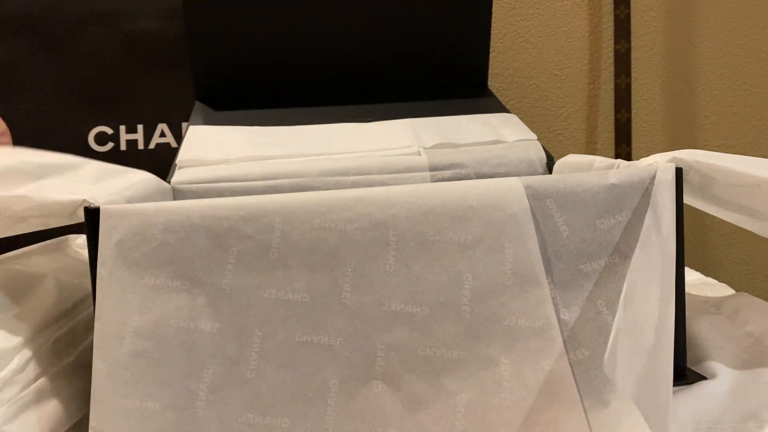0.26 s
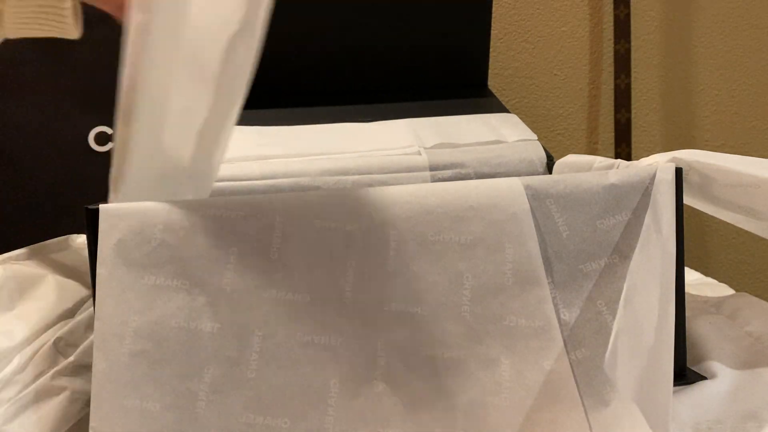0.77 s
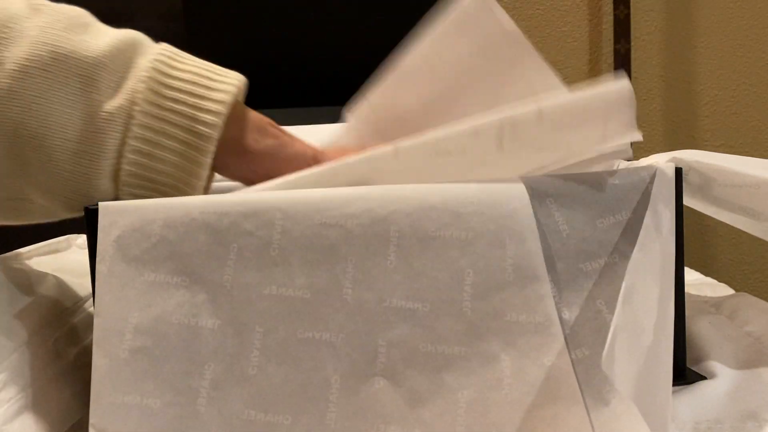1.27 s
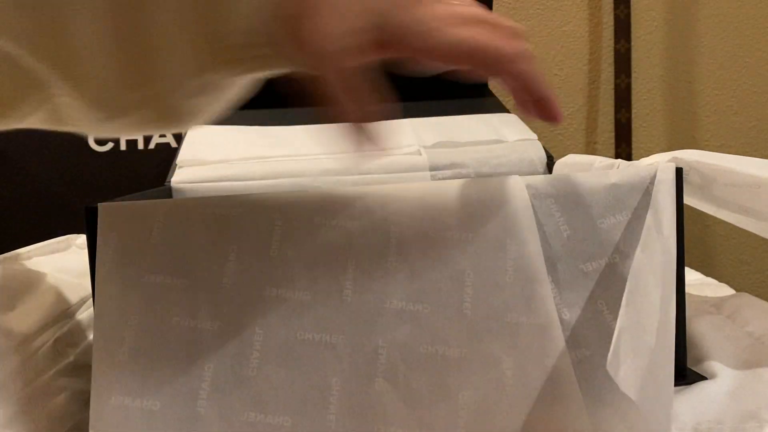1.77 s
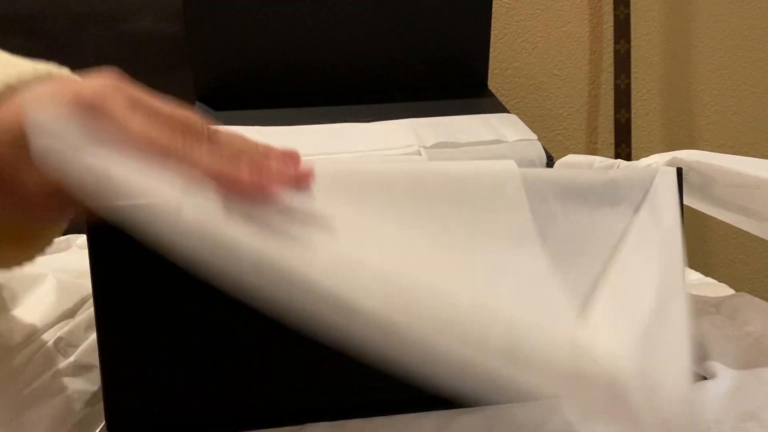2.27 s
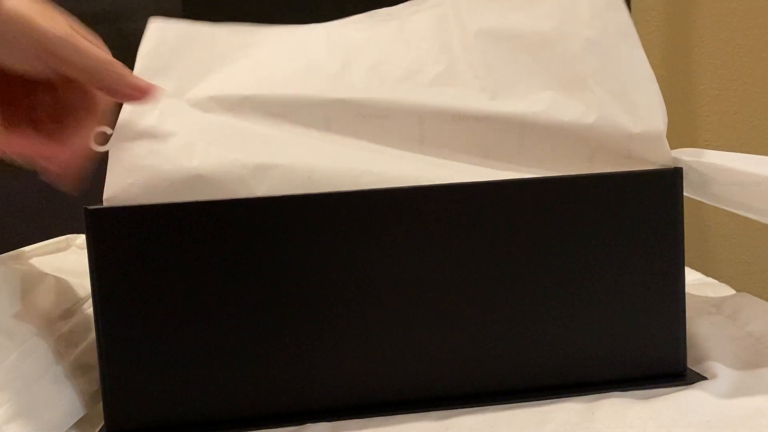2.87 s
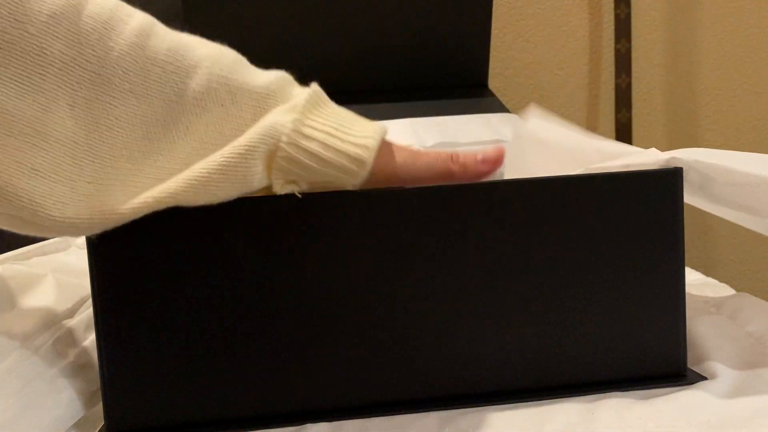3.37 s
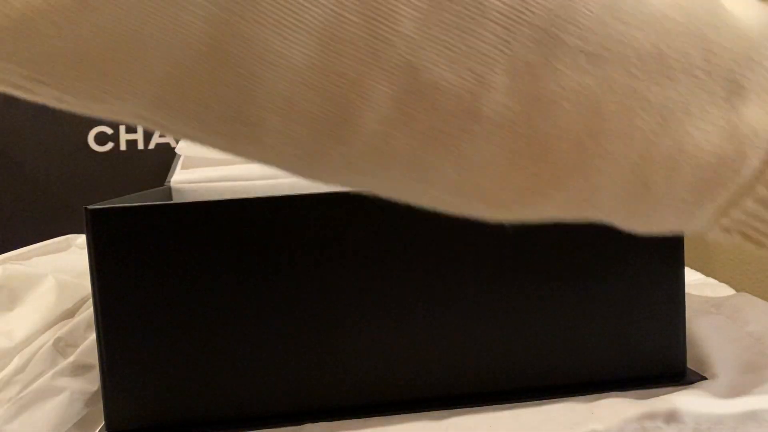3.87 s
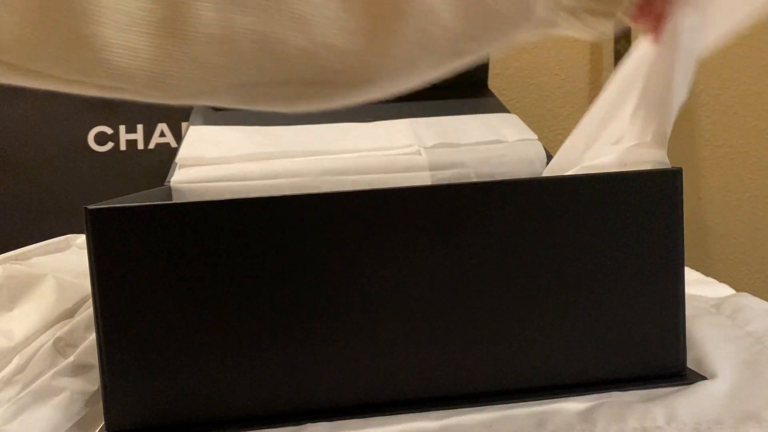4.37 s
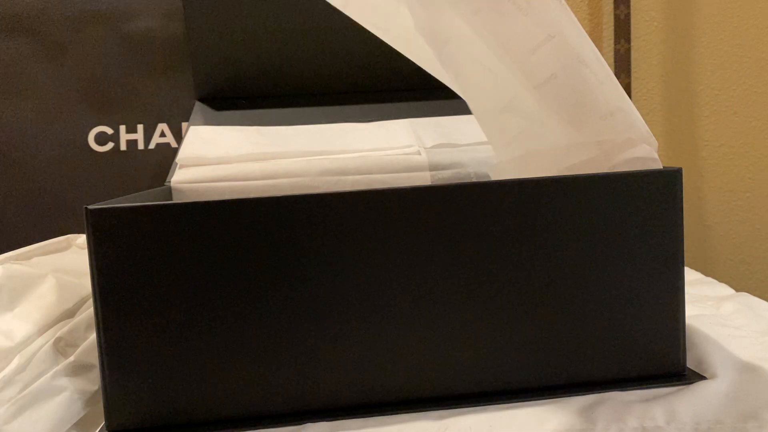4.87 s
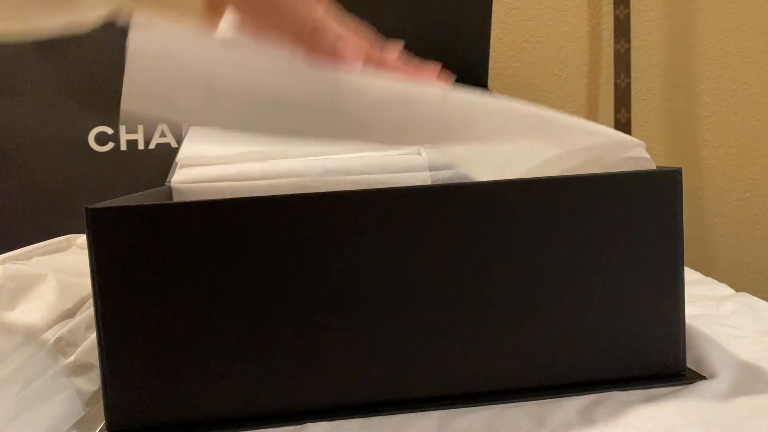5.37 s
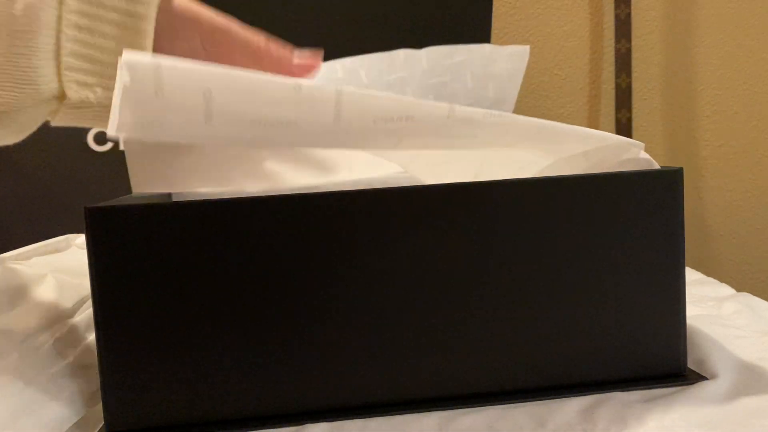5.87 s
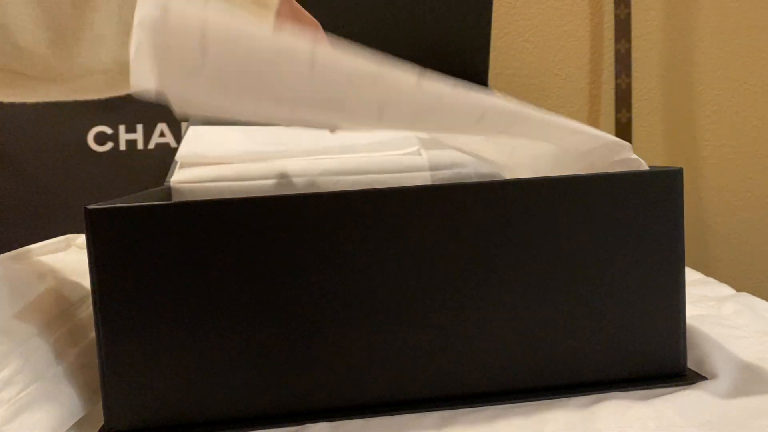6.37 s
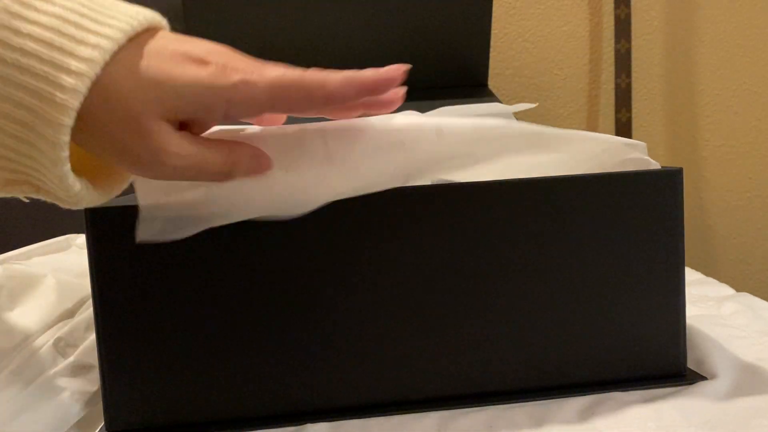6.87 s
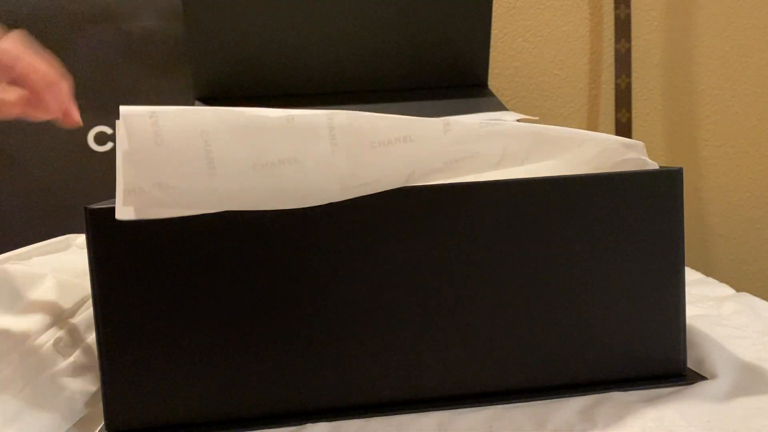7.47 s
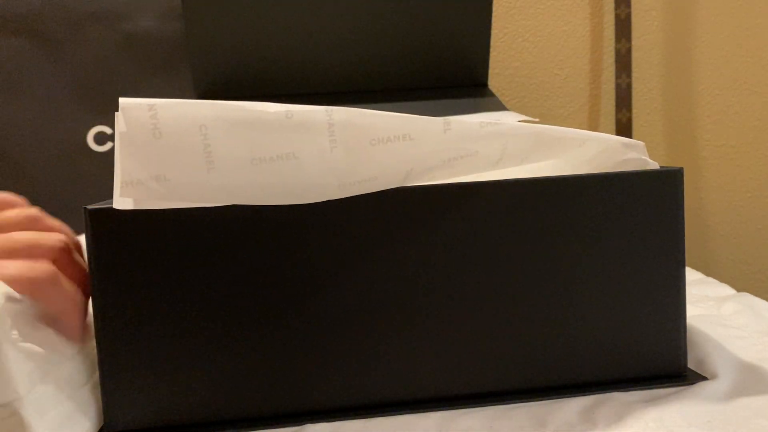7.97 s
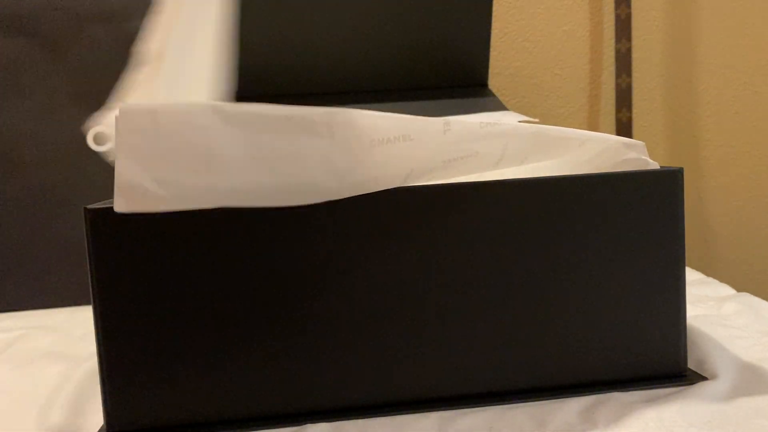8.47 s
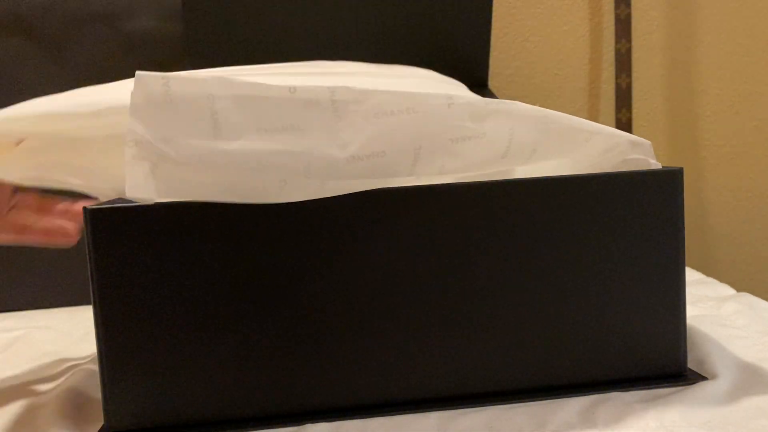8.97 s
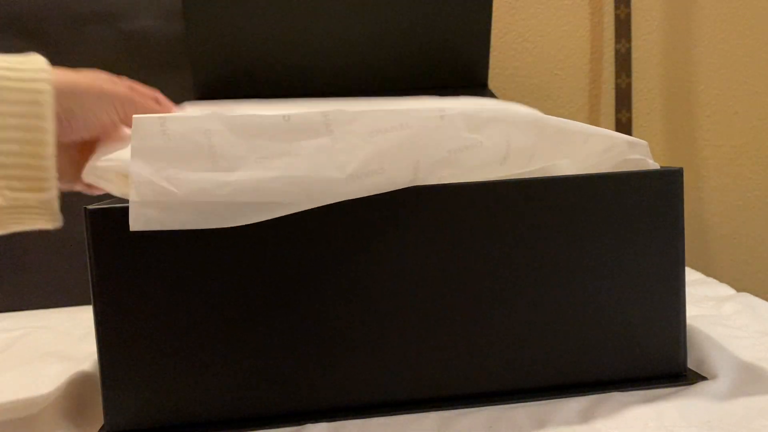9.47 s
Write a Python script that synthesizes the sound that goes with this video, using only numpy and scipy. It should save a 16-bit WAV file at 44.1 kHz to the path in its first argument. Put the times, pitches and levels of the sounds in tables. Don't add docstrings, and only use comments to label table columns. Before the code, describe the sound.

Hands fold, sweep and tuck thin tissue paper over a rigid cardboard box, crackling densely, ticking as it settles, with dull muffled bumps.

```python
import sys
import numpy as np
from scipy import signal
from scipy.fft import rfft, irfft, next_fast_len
from scipy.io import wavfile
from scipy.ndimage import uniform_filter1d

SR = 44100
rng = np.random.default_rng(int(sys.argv[2]) if len(sys.argv) > 2 else 0)


def generate_wav(signal):
    frames = np.transpose(np.atleast_2d(signal))
    scaled = np.clip(frames, -1, 1) * 32767
    pcm = np.round(scaled).astype(np.int16)
    wavfile.write(sys.argv[1], SR, pcm)


N = 428652
SIZE = next_fast_len(N)
HZ = np.arange(SIZE // 2 + 1) * SR / SIZE + 1e-3


def from_db(db):
    return 10 ** (np.asarray(db) / 20)


def at_hz(points):
    hz, value = np.transpose(points)
    return np.interp(np.log(HZ), np.log(np.maximum(hz, 1)), value)


def above(edge_hz, steep):
    return 1 / (1 + (edge_hz / HZ) ** steep)


def back(spectra):
    return irfft(spectra, SIZE)[:, :N]


def fade(x, t60):
    return signal.lfilter([1], [1, -from_db(-60 / (t60 * SR))], x + 1e-18)


def impulses(per_s, spread_db):
    sizes = from_db(spread_db * np.minimum(rng.exponential(1, N), 2.6))
    return sizes * (rng.random(N) < per_s / SR)


def even(x, window_s):
    window = int(window_s * SR)
    power = uniform_filter1d(np.mean(x ** 2, axis=0), window)
    return x / np.sqrt(uniform_filter1d(power, window) + 1e-20)


# frequency in Hz, likeness from 0 to 1.
PORT_LIKENESS = [(60, 0.99), (110, 0.73), (200, 1), (380, 0.72), (700, 0.54), (1290, 0.59), (2380, 0.19),
                 (4400, 0.54), (8120, 0.033), (15000, 0.049)]
# frequency in Hz, left over right in dB.
LEFT_OVER_RIGHT = [(60, -0.5), (250, 3.5), (1000, 0.5), (2500, 3), (5000, 3.5), (8000, -8.5)]
# frequency in Hz, phase in radians.
LEFT_LEAD = [(300, 0.23), (1000, 0.81), (1600, 1), (2600, 0.53), (4000, 0.28), (5600, -0.78)]


def spread(pair):
    mid, side = rfft(pair, SIZE)
    alike = np.clip(at_hz(PORT_LIKENESS), 0, 0.98)
    both = np.sqrt(1 + alike) * mid + np.sqrt(1 - alike) * side * [[1], [-1]]
    halves = np.array([[0.5], [-0.5]])
    lead = np.exp(1j * at_hz(LEFT_LEAD) * halves)
    return both * lead * from_db(at_hz(LEFT_OVER_RIGHT) * halves) / np.sqrt(2)


# frequency in Hz, level in dB per Hz.
ROOM_COLOUR = [(25, 9), (70, 11), (200, 1.5), (800, -59.5), (2750, -40), (8000, -19), (16000, 0.5)]


def room_tone():
    noise = back(spread(rng.standard_normal((2, N))) * from_db(at_hz(ROOM_COLOUR)))
    return from_db(-69.5 + 3.5) * noise / np.std(noise)


# frequency in Hz, level in dB per Hz.
PAPER_COLOUR = [(25, -25), (64, -19), (138, -14.5), (414, -6), (800, -1), (1000, 2.5), (1250, 0.5),
                (1600, 1), (3600, 4), (7000, -1), (11000, -4), (16000, -5)]
ZONE_EDGES = (600, 2200, 7000)
# time in seconds, crackle level in dB, bulk over crackle in dB.
FEEL_FLAP = [(0.0, -48.5, -16), (0.06, -54.5, -12), (0.106, -48, -12.5), (0.23, -56, -9), (0.25, -53, -14)]
LIFT_FLAP = [(0.258, -47.5, -7.5), (0.396, -48, -10.5), (0.416, -42.5, -10), (0.522, -46.5, -8.5),
             (0.69, -39.5, -10), (0.896, -50, -10), (1.038, -53.5, -23), (1.128, -45, -28)]
LAY_FLAP = [(1.137, -38, -27), (1.204, -42, -22.5), (1.428, -44, -9.5), (1.698, -72.5, -10.5),
            (1.894, -76, -33), (1.9, -79, 4)]
TOUCH_FRONT = [(1.908, -58.5, -12), (1.988, -64.5, -19), (2.0, -62, -6), (2.078, -56, -31)]
SWEEP_FRONT = [(2.087, -38, -30), (2.112, -39.5, -18.5), (2.268, -37, -18.5), (2.312, -31.5, -13),
               (2.36, -37.5, -7.5), (2.462, -32.5, -6), (2.638, -41.5, -8), (2.688, -36.5, -5.5),
               (2.76, -48.5, -0.5)]
FRONT_SETTLES = [(2.77, -49.5, -4.5), (2.926, -52, 2.5), (3.002, -61, -6), (3.122, -60, 2.5),
                 (3.142, -70, 7), (3.262, -53.5, -2)]
PRESS_DOWN = [(3.274, -38.5, -4), (3.286, -32.5, -6), (3.39, -38, -14.5), (3.42, -42.5, -3.5),
              (3.492, -39.5, -4), (3.765, -67.5, -10), (3.964, -72, -19), (4.02, -53, -13)]
PULL_SIDE = [(4.028, -43.5, -16), (4.06, -47.5, -10), (4.426, -45.5, -9), (4.644, -40.5, -8),
             (4.78, -48.5, -7.5), (4.832, -42, -18), (4.868, -49, -9), (5.238, -74.5, -19),
             (5.25, -64, -34)]
FOLD_OVER = [(5.262, -41.5, -37), (5.284, -37, -28), (5.346, -41, -15.5), (5.458, -37.5, -12.5),
             (5.608, -45.5, -5), (5.948, -61, -10.5), (5.956, -50.5, -27), (6.17, -52, -18),
             (6.176, -44.5, -34)]
TUCK = [(6.19, -37.5, -22.5), (6.276, -43, -24), (6.374, -40, -12.5), (6.418, -35.5, -12.5),
        (6.458, -42.5, -12.5), (6.644, -48.5, -13), (6.668, -49.5, -16)]
TUCK_SETTLES = [(6.676, -54.5, -17), (6.788, -57, -18), (6.85, -51.5, -17)]
SMOOTH_TOP = [(6.86, -44.5, -23), (6.944, -36.5, -7.5), (7.138, -40, -4.5), (7.194, -35, -4),
              (7.292, -43.5, -2.5), (7.35, -36, -14), (7.368, -45, -7), (7.422, -44.5, -7.5),
              (7.65, -69, -1)]
PINCH = [(7.657, -48, -14), (7.742, -47.5, -3.5), (7.798, -53, -13), (7.822, -52.5, -22), (7.932, -53, -23)]
DRAW_OUT = [(7.942, -47.5, -23), (8.078, -40.5, -16.5), (8.178, -44, -11), (8.24, -51.5, -25),
            (8.338, -41.5, -26.5), (8.53, -50, -24), (8.54, -51, -16)]
SWING_ROUND = [(8.548, -46.5, -17), (8.606, -47.5, -18.5), (8.77, -44, -22), (8.78, -44, -19)]
LIFT_GOODS = [(8.794, -38, -14), (8.828, -35, -7), (8.902, -37.5, -12.5), (8.938, -42, -15),
              (8.992, -39, -7.5), (9.246, -54.5, -10)]
SHIFT_GOODS = [(9.254, -47, -14.5), (9.374, -41, -5.5), (9.41, -40.5, -10.5), (9.682, -38, -2.5),
               (9.71, -44, -6), (9.72, -42, -10.5)]
# start in seconds, rustle in dB, crispness in dB.
PAPER_IN_GRIP = [(0, -3, -1.1), (.95, 3, -0.6), (2.08, -1.7, -0.6), (3.27, 0, -1.5), (4.02, 1.5, 1.5),
                 (5.25, 0, 0.8), (5.4, -0.1, 0.2), (6.3, -3, -0.74), (7.4, -0.7, 0.5), (7.9, -0.5, 0),
                 (8.22, 3, -1), (8.54, -0.8, 0), (8.79, -3.5, -4)]


def crinkle():
    s, crackle_db, bulk_db = np.transpose(
        FEEL_FLAP + LIFT_FLAP + LAY_FLAP + TOUCH_FRONT + SWEEP_FRONT + FRONT_SETTLES
        + PRESS_DOWN + PULL_SIDE + FOLD_OVER + TUCK + TUCK_SETTLES + SMOOTH_TOP
        + PINCH + DRAW_OUT + SWING_ROUND + LIFT_GOODS + SHIFT_GOODS)
    since, layers_db, fresh_db = np.transpose(PAPER_IN_GRIP)
    grip = np.maximum(np.searchsorted(since, s) - 1, 0)
    harder_db = crackle_db + 46
    rustle_db = layers_db[grip] - 1 + 0.47 * bulk_db
    crisp_db = fresh_db[grip] + 2 + 0.25 * harder_db

    t = np.arange(N) / SR
    worked_db = np.interp(t, s, crackle_db)
    dense = 1.9 * from_db(0.25 * (worked_db + 46))
    fine = fade(impulses(1500, spread_db=1.0), 0.00098)
    coarse = fade(impulses(140, spread_db=3.5), 0.0058)
    clicks = (fine + coarse + dense) * rng.standard_normal((2, N))
    spectra = spread(clicks) * from_db(at_hz(PAPER_COLOUR))

    low, middle, high = (above(hz, 8) for hz in ZONE_EDGES)
    steady, quick = from_db(worked_db), folds()
    shared = fade(impulses(110, spread_db=3.0), 0.017)
    # zone, level over crackle in dB, trim in dB, share of folds, of cracks, of brightness.
    zones = [(middle - high, 0 * s, -1.5, 0.36, 0.48, -0.6),
             (1 - low, bulk_db, -1.0, 0.46, 0.26, -0.5),
             (low - middle, rustle_db, 0.0, 0.63, 0.46, -0.82),
             (high, crisp_db, 7.5, 2.24, 0.68, 0.43)]
    out = 0
    for zone, over_db, trim_db, fold_share, crack_share, bright_share in zones:
        own = fade(impulses(131, spread_db=9.5), 0.066)
        clumps = 10.7 + shared + 0.41 * own
        effort = steady + fold_share * quick + crack_share * cracks(bright_share)
        gain = effort * from_db(np.interp(t, s, over_db) + trim_db)
        out = out + even(clumps * back(spectra * zone), 0.19) * gain
    hollow_hz = 430 * 2 ** (7 * bulk_db)
    return sheet_shape(out, s, hollow_hz)


# time in seconds, level in dB, brightness in dB.
CRACKS_FRONT = [(0.016, -41, 3), (0.0249, -51, 0), (0.0863, -37, -4), (0.106, -37, -4), (0.1397, -32, 3),
                (0.1492, -37, 1), (0.1596, -35, 1), (0.1956, -38, 15), (0.2673, -41, 21), (0.2868, -32, 9),
                (0.3682, -41, -2), (0.4096, -30.5, 2), (0.4515, -33, 8), (0.4954, -39, -2),
                (0.5088, -39, -1), (0.6066, -27, -1), (0.6632, -23, -13), (0.813, -33, -12),
                (0.8541, -37, 7), (0.876, -44, 5), (0.8955, -45, 13), (0.9269, -46, 3), (0.9902, -34, 1),
                (0.9977, -38, -1), (1.0072, -39, -13), (1.0302, -45, -10), (1.0965, -38, 10),
                (1.2247, -41, 8), (1.2367, -41, -1), (1.327, -41, -4), (1.4302, -46, -9), (1.4575, -35, -6),
                (2.0914, -30.5, -7), (2.176, -20, -7), (2.2046, -23, -10), (2.3013, -33, -1),
                (2.3117, -37, 5), (2.3951, -27, 14), (2.4674, -20, 2), (2.6555, -24, -9), (2.6814, -27, 0),
                (2.766, -23, 1), (2.7862, -38, 10), (3.075, -39, 10)]
CRACKS_FOLD = [(3.2805, -33, 0), (3.382, -25, 3), (3.4514, -22, -7), (3.4951, -45, -2), (3.611, -26, -1),
               (4.031, -42, 4), (4.0425, -33, -6), (4.075, -36, 16), (4.0967, -40, 4), (4.1635, -30, -5),
               (4.173, -34, -13), (4.226, -30, -15), (4.2927, -41, 15), (4.3272, -30.5, -5),
               (4.352, -35, 5), (4.473, -34, -8), (4.49, -25.5, 11), (4.537, -27, 5), (4.5596, -30, -2),
               (4.6065, -37, 0), (4.646, -24.5, 5), (4.6773, -29, -7), (4.7148, -30, 11), (4.7412, -39, 8),
               (4.809, -31, 17), (4.8325, -34, 19), (4.846, -33, 10), (5.2835, -28, 10), (5.3583, -36, -12),
               (5.4681, -27, -7), (5.616, -39, -3), (5.846, -43, -12), (6.1896, -36, -5), (6.2515, -25, 9)]
CRACKS_LIFT = [(6.3087, -23, -7), (6.3181, -30, -3), (6.3945, -34, 1), (6.4144, -37, -8), (6.527, -34, 2),
               (6.5795, -32, 8), (6.6545, -38, 1), (6.6639, -46, 1), (6.8375, -39, 13), (6.8465, -31, 9),
               (6.8878, -27, 12), (6.9432, -29, 18), (6.9746, -18, 0), (6.9955, -24, 14), (7.0505, -28, 12),
               (7.1862, -36, 9), (7.3518, -34, 2), (7.7205, -41, 5), (7.7289, -51, -2), (7.9385, -32, 10),
               (7.9599, -34, 4), (7.9893, -26, 2), (8.0397, -33, 14), (8.0642, -27, -1), (8.134, -27, 7),
               (8.2253, -42, 4), (8.2443, -28, -1), (8.2926, -29, 4), (8.3061, -29, -5), (8.3322, -36, -18),
               (8.356, -36, -8), (8.4383, -40, -9), (8.5155, -33, -9), (8.5461, -53.5, 5), (8.5695, -29, 3),
               (8.5815, -25, 3), (8.8314, -28, 3), (8.8544, -22, 6), (8.8953, -25, 5), (9.012, -27, -5),
               (9.1652, -43, 6), (9.2225, -46.5, -3), (9.2375, -44.5, -2), (9.2585, -30, 8),
               (9.3324, -30, 15), (9.3383, -32, -1), (9.523, -26, 3.5), (9.68, -38, 1)]


def cracks(bright_share):
    s, db, bright_db = np.transpose(CRACKS_FRONT + CRACKS_FOLD + CRACKS_LIFT)
    rise_s, t60_s, usual_bright_db = 0.0031, 0.019, -2.5
    clicks, t = np.zeros(N), np.arange(2000) / SR
    clicks[(s * SR).astype(int)] = from_db(db + bright_share * (bright_db - usual_bright_db))
    shape = from_db(-60 * t / t60_s) * (1 - np.exp(-t / rise_s))
    return signal.fftconvolve(clicks, shape)[:N]


# time in seconds, peak in dB, centre in Hz, crispness in dB.
FINGER_SNAPS = [(0.124, -32, 3170, -19), (0.174, -27, 5150, -11), (0.433, -19.5, 4300, -5),
                (1.137, -20, 6440, -23), (4.891, -41, 3290, 0), (4.934, -36, 2350, 2),
                (5.1053, -49, 4310, -4), (5.1257, -35.5, 4610, -20), (5.249, -35, 3260, -21),
                (5.0664, -41.5, 2500, -7), (5.675, -20.5, 4060, -18), (5.71, -18.5, 4760, -23),
                (4.342, -15, 5200, -27), (5.8694, -39.5, 4430, -23), (5.8885, -29.5, 2850, -10),
                (5.9524, -30, 4280, -23), (5.996, -21, 4370, -16), (6.066, -28, 4300, -16),
                (6.0832, -25, 4710, -10), (6.1234, -25, 4950, -22), (6.6906, -29, 4390, -15),
                (6.7197, -37, 2550, -10), (6.793, -29.5, 3890, -7), (7.4575, -30, 3920, -8),
                (7.4848, -24, 4340, -17), (7.588, -28.5, 3320, -12), (7.6596, -23, 4000, -11),
                (7.679, -26, 3280, -7), (7.808, -36, 3540, -4), (7.8777, -32, 3530, -13)]
# time in seconds, peak in dB, centre
# in Hz, crispness in dB.
MORE_SNAPS = [(1.5867, -29.5, 4530, -30), (1.649, -36, 1960, -28), (1.6674, -39, 5060, -30),
              (1.6933, -40, 2170, -15), (1.7767, -42, 4470, -31), (1.854, -39, 4130, -28),
              (1.9125, -25, 2830, -18), (1.9954, -38, 1590, -28), (2.0097, -29, 2740, -26),
              (2.022, -32, 2750, -24), (2.0344, -32, 2790, -16), (2.0566, -40, 2790, -18),
              (2.7538, -27, 3840, -10), (2.8256, -19, 6470, -21), (2.869, -30, 3810, -4),
              (2.9724, -36, 2110, -9), (3.008, -20.5, 2780, -33), (3.066, -27, 4030, -21),
              (3.1088, -38, 2740, -31), (3.1117, -24.5, 2750, -14.5), (3.171, -37, 4000, -27),
              (3.1815, -40, 3000, -24), (3.19, -39, 6400, -25), (3.202, -36, 2080, -11),
              (3.2346, -36, 4080, -7), (3.728, -42, 5620, -7), (3.811, -42.5, 6480, -14),
              (3.845, -40, 2400, -10), (3.974, -37, 2820, -18), (3.987, -45, 3420, -7)]


def snaps():
    events = MORE_SNAPS + FINGER_SNAPS
    out, t = np.zeros((2, N)), np.arange(2400) / SR
    chance = rng.standard_normal((len(events), 3, len(t)))
    bright = signal.butter(3, 7000, "high", fs=SR, output="sos")
    tick_fall = from_db(-60 * t / 0.0029) + 0.38 * from_db(-60 * t / 0.025)
    for (s, db, hz, crisp_db), noise in zip(events, chance):
        pop = np.sin(2 * np.pi * hz * t) * from_db(-60 * t * hz / 9.2)
        tick = from_db(crisp_db + 18.0) * signal.sosfilt(bright, noise[2]) * tick_fall
        colour = signal.butter(1, [hz / 1.44, min(hz * 2.13, 18000)], "band", fs=SR)
        scatter = signal.lfilter(*colour, noise[:2] + 0.53 * noise[2]) * from_db(1 - 60 * t / 0.027)
        i = round(s * SR)
        out[:, i:i + len(t)] += from_db(db - 10.5) * (pop + tick + scatter)
    return out * from_db([[1.3], [-1.3]])


def bedroom(x):
    t = np.arange(12000) / SR
    dull = signal.lfilter([0.4], [1, -0.6], rng.standard_normal((2, len(t))))
    tail = dull * from_db(-60 * t / 0.2) * (t > 0.004)
    tail = tail / np.sqrt(np.sum(tail ** 2, axis=1, keepdims=True))
    return signal.fftconvolve(x, tail, axes=1)[:, :N]


# time in seconds, peak in dB, t60 in seconds.
FOLDS_GIVING_WAY = [(0.407, -26, 0.04), (0.434, -46, 0.045), (0.658, -18, 0.04), (1.2206, -25, 0.059),
                    (2.0854, -48, 0.098), (2.172, -21, 0.058), (2.2039, -24, 0.027), (2.297, -31, 0.31),
                    (2.465, -20.5, 0.33), (2.654, -26, 0.07), (3.278, -41, 0.052), (4.163, -31.5, 0.19),
                    (4.225, -29, 0.031), (4.4747, -41, 0.055), (4.6059, -30, 0.089), (5.353, -21, 0.024),
                    (5.4675, -36, 0.076), (6.1865, -38, 0.028), (6.3081, -41, 0.07), (6.867, -25.5, 0.14),
                    (6.931, -16.5, 0.034), (7.343, -15, 0.022), (7.956, -25, 0.13), (8.0694, -24, 0.027),
                    (8.5455, -42, 0.23), (9.33, -25, 0.11), (9.5018, -27, 0.089)]


def folds():
    out, t = np.zeros(N), np.arange(9000) / SR
    for s, db, t60 in FOLDS_GIVING_WAY:
        i = round(s * SR)
        fold = from_db(db - 19.5 - 60 * t / t60) * (1 - np.exp(-t / 0.0011))
        out[i:i + len(t)] += fold[:N - i]
    return out


# time in seconds, half length in seconds, centre in Hz, lift in dB, width in octaves.
SLIDING_SWISHES = [(0.417, .04, 3980, 5.5, .3), (1.98, 0.08, 2780, 6, 0.11), (2.57, 0.033, 6560, 4, 0.48),
                   (4.553, .04, 4300, 3.5, 0.28), (4.62, 0.054, 1120, 4, 0.22),
                   (5.05, 0.071, 320, 14, 0.33), (5.34, .07, 3000, 3.5, 0.45),
                   (6.978, 0.051, 6800, 2, 0.49), (7.205, .06, 450, 0.5, 0.43),
                   (8.12, .06, 3200, 2.5, 0.44), (8.354, .1, 3600, 4.5, 0.36)]


def sheet_shape(x, s, hollow_hz):
    hz, t, frames = signal.stft(x, SR, nperseg=1024)
    hz = hz[:, None]
    octaves = np.log2((hz + 1) / np.exp(np.interp(t, s, np.log(hollow_hz))))
    pocket_db = 1.53 * np.exp(-(octaves / 0.087) ** 2)
    shapes = uniform_filter1d(rng.standard_normal((28, len(t))), size=5) * np.sqrt(5)
    third_octave = np.clip(3 * np.log2((hz[:, 0] + 1) / 40), 0, 27).astype(int)
    patches_db = 1.45 * shapes[third_octave] * (hz < 6400)
    frames = frames * from_db(pocket_db + patches_db)
    for at, half_s, centre_hz, lift_db, width in SLIDING_SWISHES:
        band = (np.log2((hz + 1) / centre_hz) / width) ** 2
        frames = frames * from_db(lift_db * np.exp(-band - ((t - at) / half_s) ** 2))
    return signal.istft(frames, SR, nperseg=1024)[1][:, :N]


# time in seconds, peak in dB, pitch in Hz, t60 in seconds, pitch sag from 0 to 1.
BOX_THUDS = [(0.421, -51, 197, 0.2, 0.03), (1.127, -54, 372, 0.21, 0.03), (2.485, -42, 92, 0.32, 0.18),
             (2.893, -34, 283, 0.17, 0.05), (3.284, -39, 79, 0.26, 0.16), (4.164, -45.5, 255, 0.22, 0.01),
             (6.933, -34.5, 200, 0.11, 0.06), (7.015, -41, 110, .12, 0.02), (7.344, -32, 235, 0.059, 0.56),
             (7.475, -41, 266, 0.066, 0), (8.962, -47, 190, 0.17, 0.1), (9.261, -52, 78, .13, 0.24),
             (0.44, -55.5, 85, .12, .1), (1.15, -58, 70, .2, 0), (2.945, -51, 101, .12, .05),
             (2.98, -48, 50, .2, 0), (3.44, -43, 66, .15, .05), (3.68, -58, 55.5, 0.33, .02),
             (6.2, -59, 90, .2, 0.16)]
# time in seconds, peak in dB, pitch in Hz.
SHEET_FLAPS = [(0.618, -40, 328), (1.222, -39, 417), (1.243, -39, 423), (1.302, -37, 450),
               (1.327, -42, 467), (1.37, -34, 460), (1.398, -30.5, 422), (1.425, -33.5, 414),
               (1.456, -36.5, 480), (2.815, -35, 364), (3.07, -42, 540), (3.427, -36, 610),
               (5.436, -33, 265), (5.52, -34, 430), (6.897, -33.5, 444), (7.001, -29, 400),
               (7.107, -32, 397), (7.179, -46, 430), (8.076, -34, 647), (8.791, -43, 323)]


def thuds():
    out, t = np.zeros(N), np.arange(9000) / SR
    flaps = [(s, db - 3.5, hz, 0.07, 0.02) for s, db, hz in SHEET_FLAPS]
    blows = BOX_THUDS + flaps
    dull = signal.butter(1, [350, 1400], "band", fs=SR)
    knocks = signal.lfilter(*dull, rng.standard_normal((len(blows), len(t))))
    knocks = knocks * from_db(10 - 60 * t / 0.14)
    for (s, db, hz, t60, sag), knock in zip(blows, knocks):
        pitch = hz * (1 - 2 * sag * np.minimum(t / 0.032, 1))
        ring = np.sin(2 * np.pi * np.cumsum(pitch) / SR)
        i = round(s * SR)
        out[i:i + len(t)] += from_db(db - 60 * t / t60) * (1 - np.exp(-t / 0.0027)) * (ring + knock)
    return out * from_db([[1.1], [-1.1]])


def scene():
    pops = snaps()
    return crinkle() + pops + from_db(-13) * bedroom(pops) + thuds() + room_tone()


def roll_off(x):
    return signal.sosfilt(signal.butter(12, 16970, fs=SR, output="sos"), x)


def record(dry):
    one_port_hz, comb_hz, in_phase_hz = 6400, 4300, 11160
    spectra = rfft(dry, SIZE)
    shared = above(one_port_hz, 14)
    turn = 2 * np.pi * (HZ - in_phase_hz) / comb_hz
    lead = np.exp(1j * (turn - 0.3 * np.sin(2 * turn)))
    loose = 0.4 * np.sin(turn) ** 2
    right = np.sqrt(1 - loose ** 2) * lead * spectra[0] + loose * spectra[1] / 2
    spectra = (1 - shared) * spectra + shared * np.array([spectra[0], right])
    passband = (1 - above(15740, 300)) * above(32, 3.9)
    mix = back(spectra * passband)
    return roll_off(mix)


dry = scene()
out = record(dry)
generate_wav(out)
```